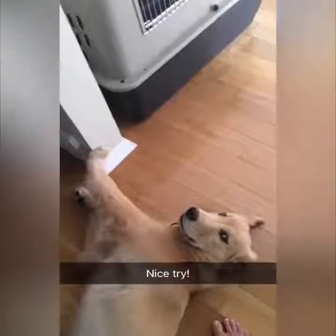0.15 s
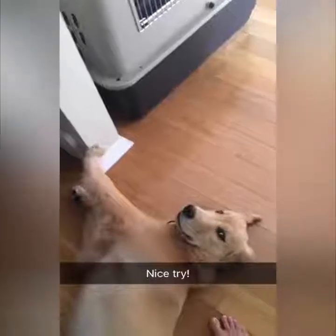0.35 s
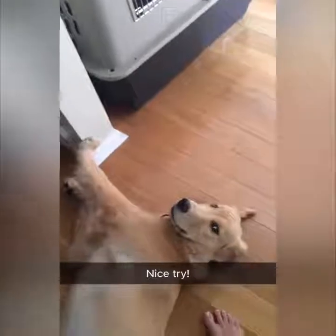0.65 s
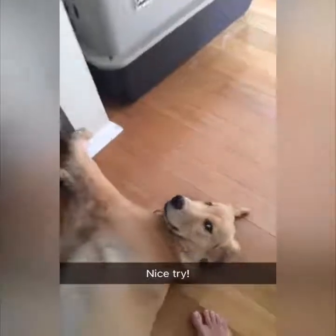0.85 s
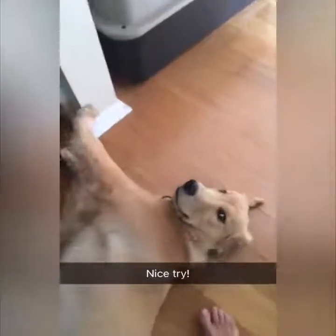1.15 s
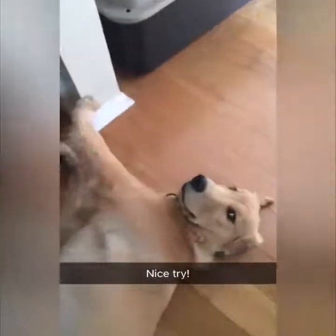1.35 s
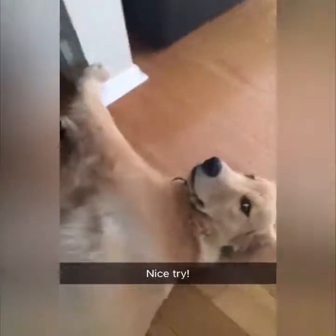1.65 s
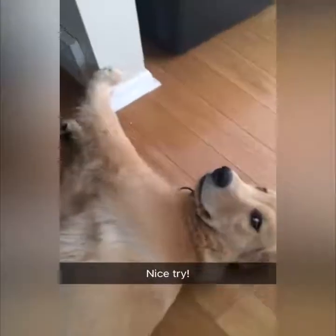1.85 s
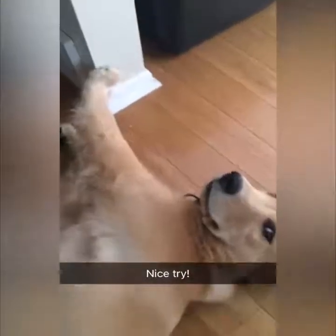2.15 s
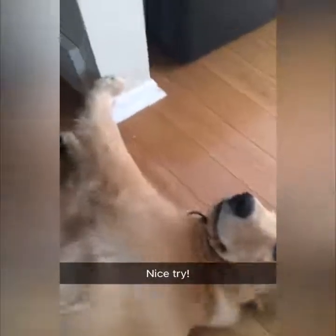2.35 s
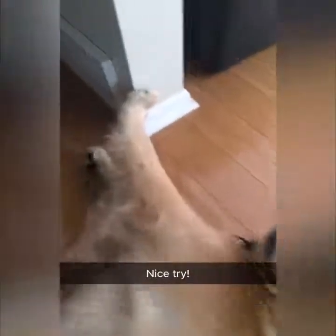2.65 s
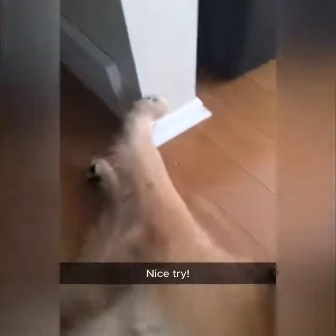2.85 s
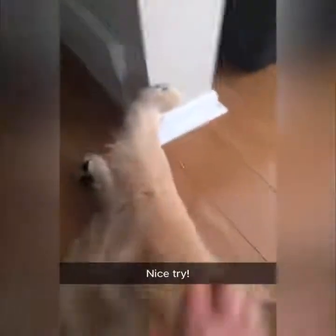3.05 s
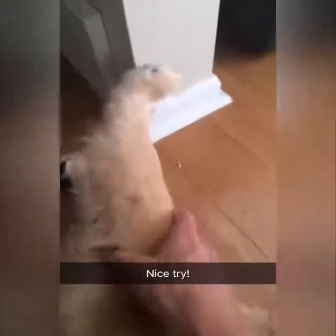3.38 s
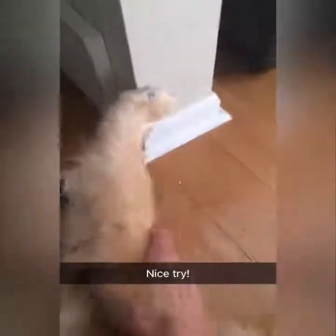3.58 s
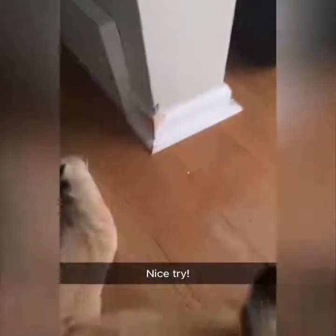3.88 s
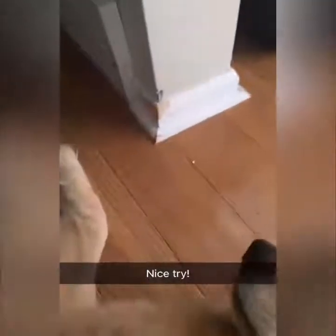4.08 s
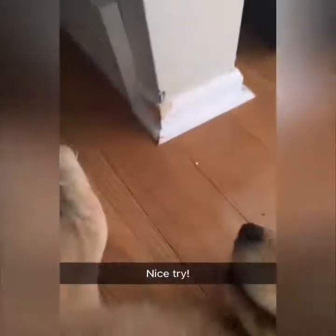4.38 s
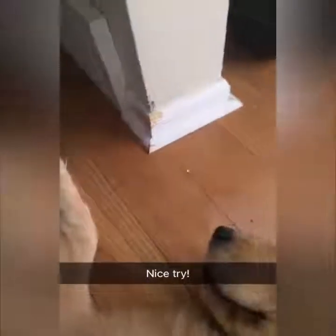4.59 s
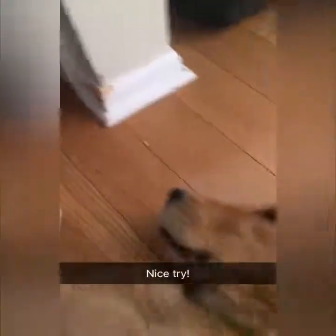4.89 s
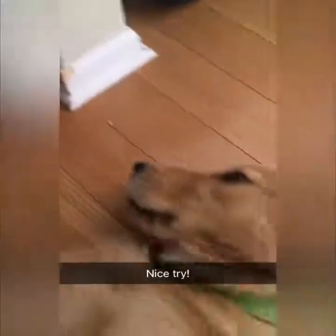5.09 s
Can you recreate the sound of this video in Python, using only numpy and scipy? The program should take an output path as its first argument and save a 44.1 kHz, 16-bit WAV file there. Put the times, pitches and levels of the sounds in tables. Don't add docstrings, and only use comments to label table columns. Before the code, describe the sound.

A dog's fur and pads drag across varnished boards in long gritty hisses, strongest after the first second, with light claws ticking. Following a short pause, limbs slap and knock the floor in quick succession and claws skid harshly, the loudest moment. A paw then sweeps off the wall's foot and lands with a low thump; only tiny clicks and soft brushes remain. Dry room, close phone-like microphone, identical on both sides.

```python
import sys
import numpy as np
from scipy import signal
from scipy.fft import rfft, irfft
from scipy.io import wavfile

SR = 44100
rng = np.random.default_rng(int(sys.argv[2]) if len(sys.argv) > 2 else 0)


def unload_audio(sound):
    columns = np.transpose(np.atleast_2d(sound))
    steps = np.round(np.clip(columns, -1, 1) * 32767)
    wavfile.write(sys.argv[1], SR, steps.astype(np.int16))


def volts_from_db(level):
    exponent = np.asarray(level, float) / 20
    return 10 ** exponent


N = 230508

# (time [s], level [dB])
RUMBLE_LEVEL = [(0.07, -50), (0.69, -47), (1.07, -49), (1.45, -45.5), (1.73, -48.5), (2.12, -45.5),
                (2.35, -52), (2.5, -50.5), (2.72, -48), (2.84, -51), (3.18, -59.5), (3.94, -60),
                (4.46, -65.5), (5.05, -63), (5.22, -56)]
# (frequency [Hz], level [dB per Hz])
RUMBLE_COLOUR = [(20, -49), (40, -29.5), (85, -31.5), (120, -17.5), (157, -8), (195, -7.5), (240, -2),
                 (272, -0.5), (308, 0.5), (370, -7), (480, -9.5), (800, -17), (1150, -31.5), (1500, -51)]
AIR_COLOUR = [(290, -29), (500, -15), (694, -13.5), (755, 5.5), (1630, 3.5), (1850, 0), (2260, -37),
              (5160, -4), (8130, 6), (15000, -33)]
DRAG_COLOUR = [(800, -11.5), (1250, -11), (1500, -4.5), (2000, -1), (2600, -0.5), (3100, -2.5),
               (3400, -5.5), (4500, -4), (5000, -11), (6200, -10.5)]
HISS_COLOUR = [(4800, -30), (5200, -17), (5800, -10.5), (6500, -6), (7800, -1), (8700, 0), (9300, -3),
               (10700, -3), (11250, -5), (11400, -40)]
SHEEN_COLOUR = [(11100, -40), (11300, -2), (12400, -4), (12800, -2), (13200, -5), (14200, -2), (15100, -3),
                (15300, -30)]
# (time at full
# level [s], hold [s], hiss [dB], drag above hiss [dB], sheen above hiss [dB])
STROKES = [(0.054, 0.078, -59, -6, 0), (0.067, 0.28, -54.5, -3.5, -15), (0.37, 0.42, -53, -5.5, -10.5),
           (0.77, 0.047, -42, -15, -10), (0.846, 0.11, -43.5, -10, -9), (0.937, 0.21, -38, -12, -14.5),
           (1.2, .37, -35, -12, -14.5), (1.606, 0.094, -40.5, -12.5, -14),
           (1.724, 0.22, -34.5, -11.5, -12.5), (1.957, 0.1, -38, -9, -11.5), (2.108, 0.045, -48, 2.5, -4),
           (2.22, 0.16, -73, 11, -6),
           (2.49, 0.018, -59, 1.5, -19),
    (2.532, 0.015, -36.5, -13, -14),
    (2.59, 0.013, -37.5, -8.5, -6),
    (2.633, .04, -46, -6, -8),
    (2.687, 0.036, -36.5, -4.5, -9),
    (2.8, 0.086, -52.5, -0.5, -1),
    (2.913, 0.082, -44.5, -7.5, -4),
    (3.058, 0.16, -52.5, -3, 2),
    (3.108, .015, -55.5, 3, -9),
    (3.255, 0.048, -49, -5.5, 0),
           (3.325, 0.14, -52.5, -5, 3),
    (3.5, 0.13, -57, -4.5, -2.5),
    (3.699, 0.13, -58.5, -2.5, -10),
    (3.897, 0.21, -65, -4, -13),
    (4.572, .42, -73.5, 0, -1),
    (5.046, .2, -64, -0.5, -1),
]
STILL_LEVELS = [-70, -72, -80]
# (time [s], peak [dB], board pitch [Hz], bright edge above it [dB])
TICKS = [(0.848, -28, 1620, 5), (0.903, -36, 1740, 6), (0.9962, -28.5, 2000, -2), (1.0635, -36, 1150, 1.5),
         (1.083, -31, 2530, -2), (1.1135, -25, 2110, 4), (1.1356, -30, 1780, 1.5), (1.1594, -30, 1760, 1),
         (1.1927, -34.5, 2350, 12), (1.429, -30.5, 2410, -2), (1.541, -35, 1530, 2)]
# (time [s], peak [dB], board pitch [Hz], 60 dB decay [s], slap [dB])
KNOCKS = [(1.936, -31.5, 310, 0.043, -4), (2.584, -28, 212, 0.036, -5.5), (2.637, -30, 210, 0.022, -8),
          (2.726, -42.5, 300, 0.018, 4), (2.746, -24.5, 292, 0.036, -35), (3.095, -40, 265, 0.13, -5),
          (3.135, -31, 215, 0.015, -15), (3.8256, -21, 163, 0.052, -21), (4.393, -50, 236, 0.06, -27),
          (4.534, -50.5, 510, 0.021, -11), (5.051, -41, 1134, 0.012, -31), (5.07, -50, 1110, 0.074, -21),
          (5.142, -49.5, 237, 0.077, -2.5)]
# (time [s],
# peak [dB], low edge [Hz], high edge [Hz], 60 dB decay [s])
BRUSHES = [(1.935, -35.5, 440, 1270, 0.067), (3.134, -37, 1640, 3700, .11), (3.743, -38, 5600, 6360, 0.17),
           (3.15, -33, 5650, 15000, .08), (3.823, -31.5, 280, 570, 0.13), (3.86, -38.5, 176, 320, 0.28),
           (4.049, -47, 6700, 15000, 0.14), (4.561, -44.5, 1350, 2400, .12), (4.56, -39, 3400, 8900, 0.095),
           (4.562, -43.5, 9400, 15200, 0.15), (4.915, -49.5, 9050, 15000, 0.17),
           (5.03, -48.5, 900, 1500, 0.53), (5.13, -46, 1020, 1830, .3), (5.18, -48.5, 885, 1690, 0.35)]
# (time [s], peak [dB], board above it [dB], sheen above it [dB], 60 dB decay [s])
SLAPS = [
    (1.9365, -20.5, -12.5, -14, .035),
    (2.584, -20, -4, -17, 0.054),
    (2.637, -23, -8, -15, 0.038),
    (2.7252, -19.5, -4, -11, .05),
    (2.732, -25.5, -8, -14, 0.025),
    (3.094, -35.5, 2, 4, 0.056),
]
# (low edge [Hz], high edge [Hz])
SLAP_BANDS = [
    (6160, 11900),
    (1540, 4550),
    (10800, 14000),
]
# (time [s], peak [dB], pitch [Hz], 60 dB decay [s], nail root above it [dB])
CLAWS = [
    (2.506, -33.5, 9700, 0.12, -25),
    (3.094, -26, 9240, .12, -19),
    (3.829, -46.5, 5600, 0.056, 12),
    (4.508, -38.5, 8360, 0.036, -20),
    (4.56, -37, 7400, .08, -12),
    (4.69, -38, 10000, 0.035, 0.5),
    (4.965, -34.5, 9400, 0.13, -28),
    (5.153, -30.5, 7030, 0.039, -13),
    (5.168, -42.5, 8550, 0.078, -.5),
]
# (level above the skid's own [dB], low edge [Hz], high edge [Hz], 60 dB decay [s])
SKID_BANDS = [
    (0.5, 7500, 9700, 0.052),
    (-8, 6600, 11400, 0.11),
    (-28.5, 4100, 5500, .1),
    (-22, 8700, 10900, 0.4),
]
# (time [s], level [dB])
SWEEP_LEVEL = [(3.70, -70), (3.72, -52), (3.74, -40), (3.748, -33), (3.762, -32), (3.777, -34),
               (3.785, -48), (3.806, -54), (3.812, -75)]
# (time [s], gain [dB])
START_GAIN = [(0, -25), (.018, -15.5), (.02, -55), (.048, -39), (.056, -12), (.068, 1.5), (5.224, 0),
              (5.228, -1)]


def rms_one(x):
    return x / np.sqrt(np.mean(x ** 2) + 1e-20)


def in_time(rows):
    s, *columns = np.transpose(rows)
    return [np.interp(np.arange(N) / SR, s, c) for c in columns]


def band(x, low_hz, high_hz, order=2):
    edges = np.clip([low_hz, high_hz], 5, 0.45 * SR)
    return signal.sosfilt(signal.butter(order, edges, "band", fs=SR, output="sos"), x)


def drift(rate):
    r = np.exp(-80 * np.pi * rate / SR)
    slow = signal.lfilter([1], [1, -2 * r, r * r], rng.standard_normal(N // 40 + 2002))[2000:]
    return np.interp(np.arange(N) / 40, np.arange(len(slow)), rms_one(slow - slow.mean()))


def friction(colour, grain_db, patchy_db, rate):
    hz, level_db = np.transpose(colour)
    slips = rng.standard_normal((2, N)) * volts_from_db(grain_db * np.minimum(rng.exponential(1, (2, N)), 6))
    edges = hz[0] * 2 ** np.arange(0, np.log2(hz[-1] / hz[0]) + 0.4, 0.4)
    together = drift(rate)
    flat = np.zeros(N)
    for k, (low, high) in enumerate(zip(edges, edges[1:])):
        if low < 0.44 * SR:
            flat += band(slips[k % 2], low, high) * volts_from_db(patchy_db * (together + drift(rate)))
    axis = np.log(np.fft.rfftfreq(N, 1 / SR) + 1)
    gain = volts_from_db(np.interp(axis, np.log(hz), level_db, left=-90, right=-90))
    ripple_count, ripple_db = 450, 2.04
    knots = rng.standard_normal(ripple_count)
    place = np.linspace(0, ripple_count - 1, len(gain))
    gain *= volts_from_db(ripple_db * np.interp(place, np.arange(ripple_count), knots))
    return rms_one(irfft(rfft(flat) * gain, N))


def burst(rise_s, t60_s, size, bend=1):
    t = np.arange(size) / SR
    swell = 1 - np.exp(-(t / max(rise_s, 1e-4)) ** 2)
    shape = swell * volts_from_db(-60 * (t / max(t60_s, 0.004)) ** bend)
    return shape / shape.max()


def add(track, s, sound):
    at = round(s * SR)
    track[at:at + len(sound)] += sound[:N - at]


def scuff(out, s, db, low_hz, high_hz, rise_s, t60_s, bend=1, crack=0):
    size = 8000
    grit = rng.standard_normal(size) * volts_from_db(0.55 * np.minimum(rng.exponential(1, size), 4))
    grit[round(rise_s * SR)] += crack
    shape = burst(rise_s, t60_s, size, bend) + volts_from_db(-16) * burst(0.0034, 0.33, size)
    add(out, s, volts_from_db(db - 11.0) * shape * rms_one(band(grit, low_hz, high_hz, order=5)))


def household():
    rumble_db, = in_time(RUMBLE_LEVEL)
    motor_hz, width_hz = 238, 5
    tone = band(rng.standard_normal(N), motor_hz - width_hz / 2, motor_hz + width_hz / 2, order=1)
    tone_db = -59 + 0.7 * (rumble_db - rumble_db.mean())
    rumble = friction(RUMBLE_COLOUR, grain_db=0.1, patchy_db=0.6, rate=14)
    air = friction(AIR_COLOUR, grain_db=0.1, patchy_db=0.5, rate=15)
    return volts_from_db(rumble_db) * rumble + volts_from_db(tone_db) * rms_one(tone) + volts_from_db(-66.5) * air


def stroke_gains():
    t = np.arange(0, N + 64, 64) / SR
    s, hold, db, drag_db, sheen_db = np.transpose(STROKES)[:, :, None]
    rise_db_per_s = 502 / (1 + hold / 0.08)
    fall_db_per_s = 181
    level = db - rise_db_per_s * np.maximum(s - t, 0) - fall_db_per_s * np.maximum(t - s - hold, 0)
    gains = []
    for above, still in zip((0, drag_db, sheen_db), STILL_LEVELS):
        power = np.sum(volts_from_db(level + above) ** 2, axis=0) + volts_from_db(still) ** 2
        gains.append(np.interp(np.arange(N) / SR, t, np.sqrt(power)))
    return gains


def rubbing(hiss, sheen):
    hiss_gain, drag_gain, sheen_gain = stroke_gains()
    drag = friction(DRAG_COLOUR, grain_db=2.0, patchy_db=1.3, rate=18)
    return drag_gain * drag + hiss_gain * hiss + sheen_gain * sheen


def ticks():
    out, size = np.zeros(N), 900
    for s, db, hz, edge_db in TICKS:
        echoes = volts_from_db(-20) * rng.standard_normal(size) * burst(0.0004, 0.012, size)
        click = signal.unit_impulse(size) + echoes
        board = band(click, hz * 0.68, hz * 1.55)
        edge = band(click, 6600, 11300, order=3)
        add(out, s, volts_from_db(db) * (board / abs(board).max() + volts_from_db(edge_db) * edge / abs(edge).max()))
    return out


def hard_press(hiss):
    press_s, peak_db, spread_s = 1.26, -45.5, 0.094
    away = (np.arange(N) / SR - press_s) / spread_s
    return volts_from_db(peak_db - away ** 2) * rms_one(band(hiss, 6000, 9500))


def knocks():
    out, size = np.zeros(N), 6000
    t = np.arange(size) / SR
    for s, db, hz, t60_s, slap_db in KNOCKS:
        board = np.sin(2 * np.pi * hz * t) + volts_from_db(-18.5) * np.sin(2 * np.pi * 1.74 * hz * t)
        swing = burst(0.004, min(t60_s, 0.07), size, bend=2.2)
        slap = rms_one(band(rng.standard_normal(size), 0.71 * hz, 3.93 * hz, order=3))
        slap = slap * burst(0.0014, 0.17, size)
        add(out, s - 0.002, volts_from_db(db - 2.5) * (board * swing + volts_from_db(slap_db) * slap))
    return band(out, 100, 6000, order=3)


def brushes():
    out = np.zeros(N)
    for s, db, low_hz, high_hz, t60_s in BRUSHES:
        scuff(out, s, db, low_hz, high_hz, 0.044 * t60_s, t60_s)
    return out


def slaps():
    out = np.zeros(N)
    for s, db, board_db, sheen_db, t60_s in SLAPS:
        for above, edges in zip((0, board_db, sheen_db), SLAP_BANDS):
            scuff(out, s, db + above, *edges, rise_s=0.0015, t60_s=t60_s, crack=11)
    return out


def claws():
    out = np.zeros(N)
    spread = 1.11
    for s, db, hz, t60_s, nail_db in CLAWS:
        parts = [(0, hz / spread, hz * spread), (nail_db, 3990, 4870), (-11, 5800, 15200)]
        for above, low_hz, high_hz in parts:
            scuff(out, s, db + above, low_hz, high_hz, 0.00063, t60_s, bend=0.99, crack=14)
    return out


def skid():
    out = np.zeros(N)
    for above, low_hz, high_hz, t60_s in SKID_BANDS:
        scuff(out, 2.867, -9.5 + above, low_hz, high_hz, 0.0064, t60_s, bend=1.86)
    return out


def swept_pad(hiss, sheen):
    whistle = band(rng.standard_normal(N), 4180, 4760) * volts_from_db(1.1 * drift(70))
    high_hiss = rms_one(band(hiss, 7330, 24400, order=4))
    return volts_from_db(in_time(SWEEP_LEVEL)[0]) * (high_hiss + volts_from_db(-18.5) * sheen + volts_from_db(-13.5) * rms_one(whistle))


def scene():
    hiss = friction(HISS_COLOUR, grain_db=2.5, patchy_db=1.1, rate=22)
    sheen = friction(SHEEN_COLOUR, grain_db=2.5, patchy_db=0.5, rate=20)
    mono = household() + rubbing(hiss, sheen) + ticks() + hard_press(hiss)
    mono += knocks() + brushes() + slaps() + claws() + skid() + swept_pad(hiss, sheen)
    return np.stack([mono, mono])


def low_pass(x):
    return signal.sosfilt(signal.butter(12, 16300, fs=SR, output="sos"), x)


def record(dry):
    top_cut = signal.ellip(10, 1, 75, 14950, fs=SR, output="sos")
    mix = signal.sosfilt(top_cut, dry) * volts_from_db(in_time(START_GAIN)[0])
    return low_pass(mix)


dry = scene()
out = record(dry)
unload_audio(out)
```